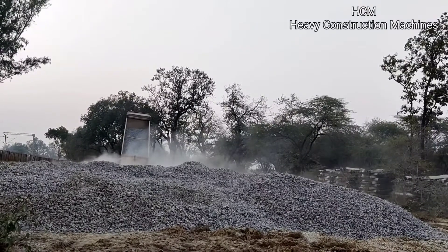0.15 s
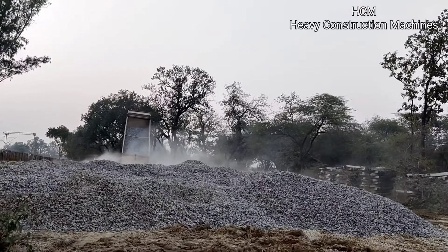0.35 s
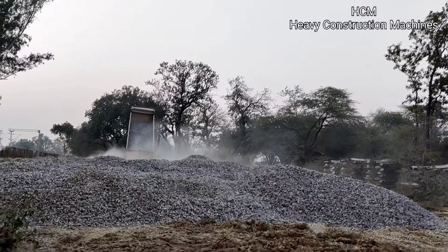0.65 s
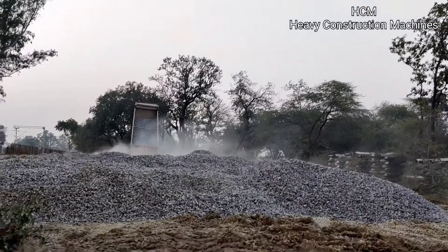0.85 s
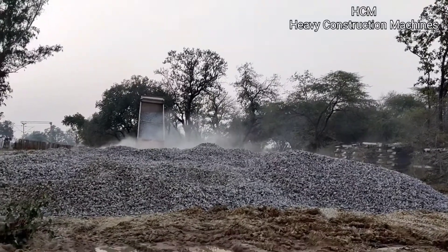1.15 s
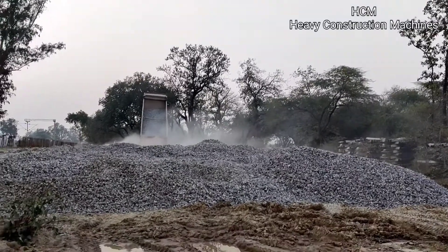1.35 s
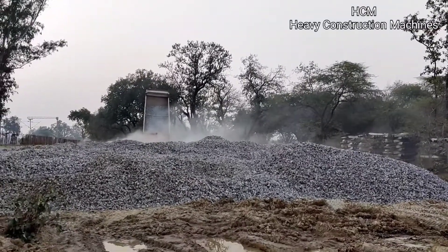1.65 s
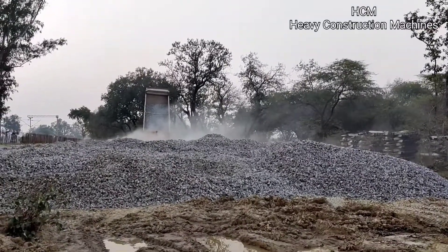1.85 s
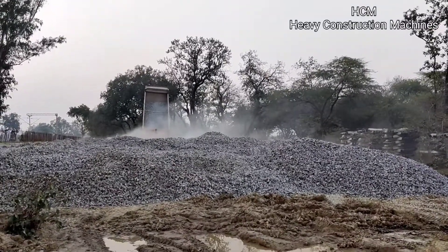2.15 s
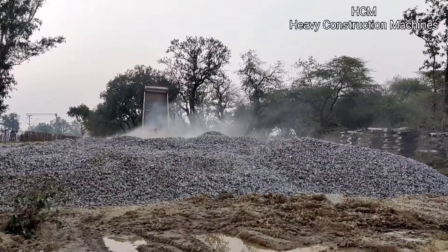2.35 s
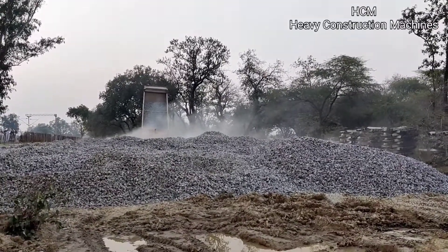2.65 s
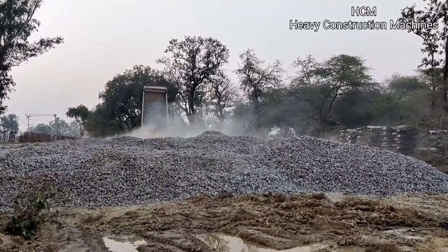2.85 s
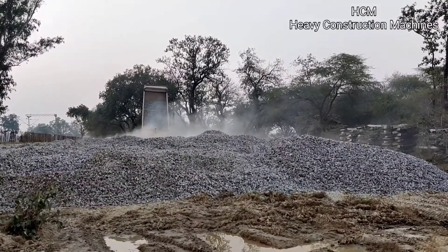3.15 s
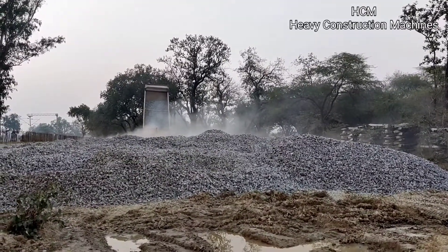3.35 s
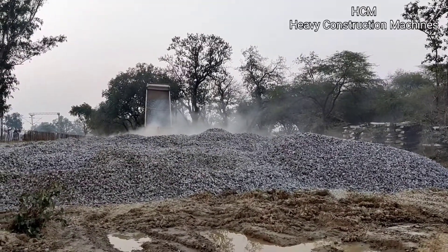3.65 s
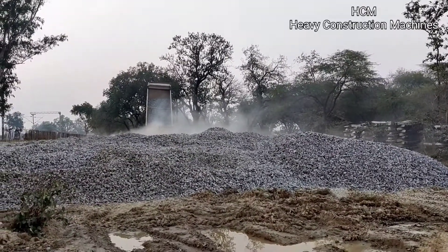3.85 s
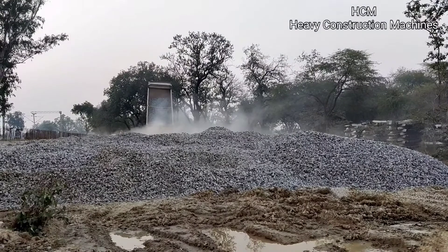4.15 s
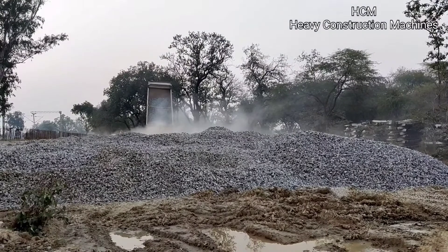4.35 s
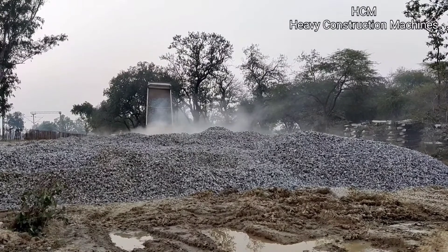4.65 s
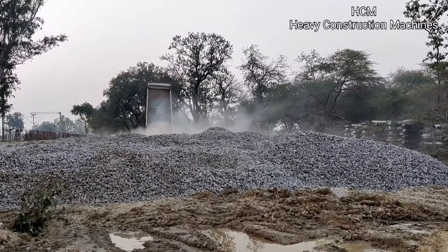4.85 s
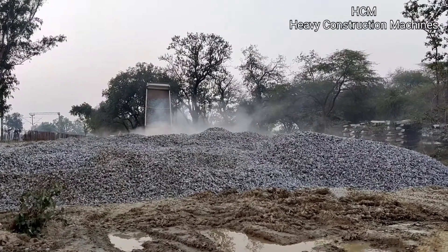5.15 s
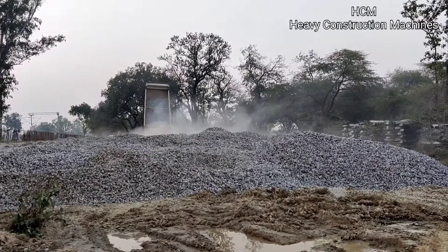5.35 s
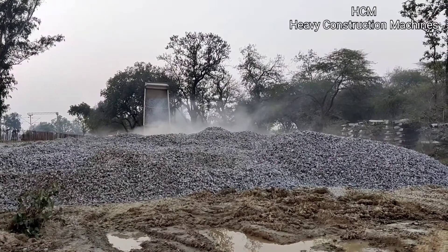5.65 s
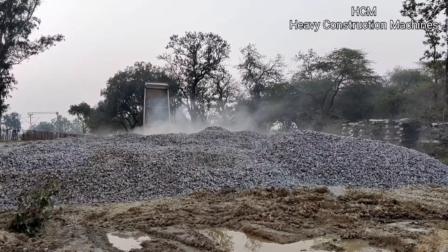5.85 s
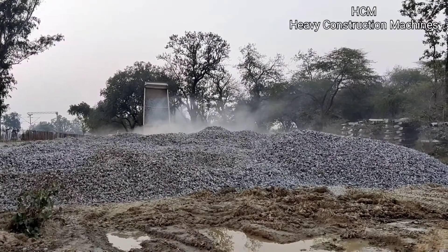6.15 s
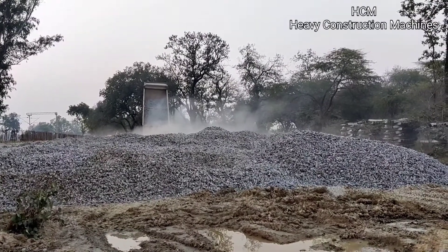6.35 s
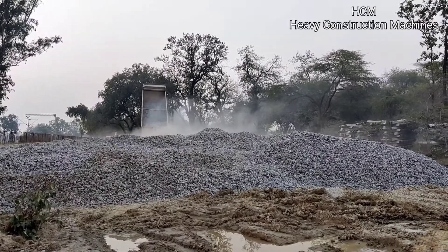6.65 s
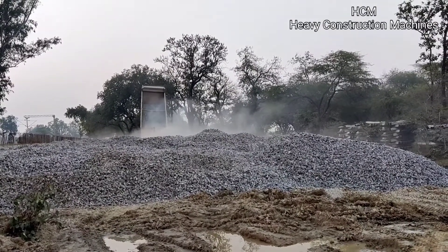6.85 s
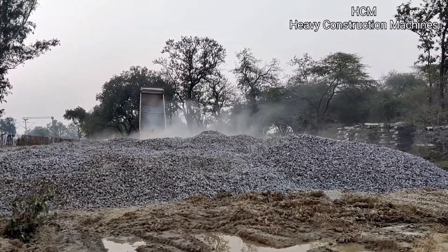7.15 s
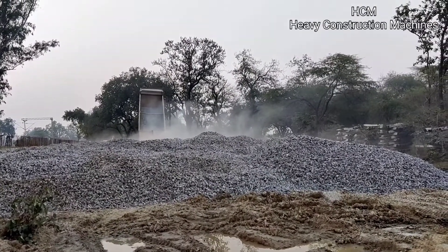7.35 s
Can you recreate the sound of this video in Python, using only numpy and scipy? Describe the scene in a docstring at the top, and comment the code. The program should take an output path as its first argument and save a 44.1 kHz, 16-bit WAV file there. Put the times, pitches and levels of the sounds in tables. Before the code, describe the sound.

Two low engines hum and throb continuously over a deep uneven rumble and faint whine. Gravel first comes in bright, quick bursts with hollow metal thuds, sharp stone clacks and tiny squeaks. It fades to a thin hiss, leaving motor and clatter forward, then a coarse roar of stone slowly swells. Open-air stockpile, distant phone microphone, slightly wide stereo.

```python
"""A tipper truck empties crushed stone behind a quarry stockpile, heard from far off in the open on a phone.
Throughout, firing tones and noise make its diesel drone and clatter; a second engine changes speed and beats.
At first stone slides from the raised body in short rushes, made of random clicks, and lumps thud on the steel.
Then the stone only trickles, until a long pour builds up, with a few more rushes and thuds near the end."""
import sys
import numpy as np
from scipy import signal
from scipy.fft import rfft, irfft
from scipy.io import wavfile
from scipy.ndimage import uniform_filter1d, minimum_filter1d

SR = 44100
rng = np.random.default_rng(int(sys.argv[2]) if len(sys.argv) > 2 else 0)


def transcribe(signal):
    """Save signal, clipped to [-1, 1], as a 16-bit WAV file at the path in sys.argv[1]."""
    frames = np.atleast_2d(signal).T
    limited = np.clip(frames, -1, 1)
    pcm = np.round(limited * 32767).astype(np.int16)
    wavfile.write(sys.argv[1], SR, pcm)


N = 331632  # length in samples, about 7.5 s


def undb(db):
    """Turn decibels into gain."""
    return 10 ** (np.asarray(db) / 20)


def curves(table):
    """Draw straight lines through a timed table: one curve per column, one value per sample."""
    s, *columns = np.transpose(table)
    return [np.interp(np.arange(N) / SR, s, column) for column in columns]


def over_bins(table):
    """Spread each column of a frequency table over the Fourier bins, along a log frequency scale."""
    hz, *columns = np.transpose(table)
    bins = np.log(np.arange(N // 2 + 1) * SR / N + 1)
    return [np.interp(bins, np.log(hz), column) for column in columns]


def unit(x):
    """Scale to an rms of 1."""
    return x / np.sqrt(np.mean(x ** 2))


def walk(rate):
    """Wander smoothly at random, spread near 1, with a new random step 'rate' times a second."""
    k = max(int(SR / rate), 1)
    steps = np.repeat(rng.standard_normal(N // k + 2), k)
    smooth = uniform_filter1d(uniform_filter1d(steps, k), k)
    return 1.62 * smooth[:N]


def swell(centre_s, half_s):
    """A bell-shaped rise and fall."""
    return np.exp(-((np.arange(N) / SR - centre_s) / half_s) ** 2)


def turning(hz, jitter):
    """Phase of a machine that turns slightly unevenly."""
    return 2 * np.pi * np.cumsum(hz * (1 + jitter * walk(30))) / SR


def tone(phase, shake_db):
    """One sine partial of rms near 1 whose level shakes."""
    start_phase = rng.uniform(0, 2 * np.pi)
    return np.sqrt(2) * undb(shake_db * walk(16)) * np.sin(phase + start_phase)


def impacts(per_s, spread_db):
    """A hail of tiny collisions of random size; a large positive spread makes a few stand out."""
    size = undb(spread_db * np.minimum(rng.exponential(size=N), 6))
    happens = rng.random(N) < per_s / SR
    return happens * size * rng.standard_normal(N)


def placed(x, pan_db):
    """Place a sound: the left port hears it a little later, and the pan makes one port louder."""
    late = np.roll(x, 16)  # samples
    return np.array([late[:N] * undb(pan_db / 2), x[:N] * undb(-pan_db / 2)])


def ports(direct, scattered, path, low_hz, high_hz, order=8):
    """Colour a sound for both ports: they share the direct part, shifted in phase; the scattered part is left only."""
    left_db, right_db, likeness, lead = over_bins(path)
    likeness = np.clip(likeness, 0, 1)
    hz = np.arange(N // 2 + 1) * SR / N + 1
    low_cut = 1 + (low_hz / hz) ** order
    high_cut = 1 + (hz / high_hz) ** (2 * order)
    edges = np.sqrt(SR / 2 / low_cut / high_cut)
    a, b = rfft(unit(direct)), rfft(unit(scattered))
    left = likeness * np.exp(1j * lead) * a + np.sqrt(1 - likeness ** 2) * b
    return irfft(edges * np.array([left * undb(left_db), a * undb(right_db)]), N)


def bursts(table, rise_s, t60_s, pan_db, width=None, order=4):
    """Each event is a dying burst of band noise, like close resonances; its row gives the width unless all share one."""
    out, t = np.zeros(N + SR), np.arange(SR // 2) / SR
    decay = np.exp(-np.log(1000) * t / t60_s)  # falls 60 dB in t60_s
    shape = (1 - np.exp(-t / rise_s)) * decay
    for s, db, hz, *own_width in table:
        ratio = 1 + (width or own_width[0])
        edges = np.clip([hz / ratio, hz * ratio], 20, SR / 2 - 1)
        band = signal.butter(order, edges, "band", fs=SR, output="sos")
        ring = shape * signal.sosfilt(band, rng.standard_normal(len(t)))
        start = int(max(s, 0) * SR)
        out[start:start + len(t)] += undb(db) * ring / np.abs(ring).max()
    return placed(out, pan_db)


def exhaust(phase, effort, note, shake_db, rough):
    """The low harmonics of an engine; load sets their balance, and firings grow uneven as it labours."""
    load, level_db = curves(effort)
    firing = phase / (2 * np.pi)
    count = np.arange(int(firing[-1]) + 2)
    # every firing draws its own strength and lateness
    draws = rng.standard_normal((len(count), 2)).T
    strength, lateness = (rough * load * np.interp(firing, count, draw) for draw in draws)
    harmonics = 0
    for k, (_, *dbs) in enumerate(note, 1):
        gain = undb(level_db + np.interp(load, [0, .5, 1], dbs))
        harmonics = harmonics + gain * tone(k * (phase + lateness / 2), shake_db)
    return (1 + strength) * harmonics


def second_engine():
    """Another engine drones at its own changing firing rate and slows toward the end."""
    # firing rate: t/s, f/Hz
    other_rate = [(0, 44.4), (.37, 41.2), (.7, 44), (1.12, 41.9), (1.42, 42.1), (1.77, 39.3), (2.14, 45.9),
                  (2.75, 43.3), (3, 43.3), (3.3, 42.1), (4.15, 40.5), (5.2, 40.3), (5.85, 38), (6.75, 33),
                  (7.52, 32.3)]
    # how hard it works: t/s, load (0-1), level change/dB
    other_effort = [(0, 0.024, 0.5), (0.901, .03, -1), (1.35, 0.28, -1), (1.9, 0.34, 0.5), (2.45, 0.68, -3),
                    (3.2, 0.87, -0.5), (3.55, 1, 1.5), (4.2, 0.81, 2), (5.6, 0.99, 2), (6.2, 0.9, 1),
                    (6.65, 1, -7), (7.52, .98, -4)]
    # balance of its note: harmonic, level/dB at light load, at half load, at full load
    other_note = [(1, -10, -15.5, -28), (2, -38, -17.5, -20), (3, -26, -40, -22.5)]
    phase = turning(curves(other_rate)[0], jitter=.0072)
    return exhaust(phase, other_effort, other_note, shake_db=.5, rough=.25)


def tipper_engine(firing):
    """The truck's diesel: more load moves its note from the fundamental to the overtones."""
    # how hard it works: t/s, load (0-1), level change/dB
    tipper_effort = [(0, 0, -1.5), (.75, 0.13, -0.5), (1.25, 0.23, -1.5), (1.7, 0.19, 0), (2.3, 0, 1),
                     (2.72, 0.09, 1), (3.02, 0.38, 1.5), (3.4, 0.53, 1.2), (3.9, 0.46, -0.5),
                     (4.45, 0.49, 1), (5.3, 1, 0.5), (6.1, 0.92, -0.5), (6.47, 0.52, -2), (6.68, 0.33, 0.7),
                     (7.2, 0.34, -0.5), (7.38, 0.72, -3), (7.52, 0.32, 1.5)]
    # balance of its note: harmonic, level/dB at light load, at half load, at full load
    tipper_note = [(1, -9.5, -16.5, -27), (2, -27.5, -15, -13.5), (3, -33.5, -38, -23.5)]
    return exhaust(firing, tipper_effort, tipper_note, shake_db=0.35, rough=.09)


def whine(firing_hz, machinery_db, shake_db, octave_shake_db, jitter):
    """A gear or pump driven by the tipper's engine; its steadier octave rings out now and then."""
    # moments when the octave rings out: centre t/s, half length/s, level/dB before the machinery level
    whine_swells = [(3.97, 0.21, -28), (6.53, .13, -32)]
    phase = turning(5.5 * firing_hz, jitter)  # 5.5 cycles per firing
    octave = undb(-42.5) + sum(undb(db) * swell(s, half_s) for s, half_s, db in whine_swells)
    main_tone = undb(-34) * tone(phase, shake_db)
    return undb(machinery_db) * (main_tone + octave * tone(2 * phase, octave_shake_db))


def hums(shake_db, jitter):
    """Deep tones that glide while they swell and fade."""
    # one hum a row: centre t/s, half length/s, f/Hz, glide/(Hz per s), level/dB at the centre
    hum_table = [(5.58, 0.35, 56.8, 25.5, -16.5), (5.997, 0.45, 213.6, -2, -23.5)]
    t = np.arange(N) / SR
    out = 0
    for s, half_s, hz, glide, db in hum_table:
        phase = turning(hz + glide * (t - s), jitter)
        out = out + undb(db) * swell(s, half_s) * tone(phase, shake_db)
    return out


def rumble():
    """Deep, uneven shudder of the truck under its moving load: random knocks, filtered low."""
    # colour of the rumble: f/Hz, relative level/dB
    rumble_colour = [(15, -17), (27, -4), (38, -7.5), (56, 3.5), (78, 3), (105, -2), (150, -4), (195, -4),
                     (250, -23.5), (400, -56)]
    colour_db, = over_bins(rumble_colour)
    return unit(irfft(rfft(impacts(900, 1.7)) * undb(colour_db), N))


def clatter(phase, depth, flutter_db):
    """Combustion knock and fan air: noise pulsing with each firing."""
    # way to the ports: f/Hz, left and right relative level/dB per Hz, likeness (0-1), left phase lead/rad
    clatter_path = [(850.0, -57.5, -53.5, 0.67, -2.5), (1090, -56.5, -50.5, 0.86, -3),
                    (1500.0, -60.5, -52, 0.82, -3), (2070, -66, -57, 0.31, -3),
                    (2580, -64.5, -59.5, 0.72, -2), (2840, -76.5, -65.5, 0.13, -9.5),
                    (3220, -64, -63, 0.51, -0.5), (3830, -78, -68, 0.19, -2.5),
                    (4200, -66.5, -64.5, 0.93, -1.4), (5410, -74.5, -61.5, 0.19, -3),
                    (6240, -71.5, -78, 1, 7.5), (7400, -80, -80.5, 0.02, -3.5),
                    (10400, -86, -86.5, 0.2, -23), (15000.0, -97, -95, 0.41, -33)]
    gate = (1 + depth * np.cos(phase)) * undb(flutter_db * walk(22.185))
    direct, scattered = gate * rng.standard_normal((2, N))
    return ports(direct, scattered, clatter_path, low_hz=846, high_hz=14600)


def drumming(flutter_db):
    """Stones tumbling along the steel floor make it boom."""
    # way to the ports: f/Hz, left and right relative level/dB per Hz, likeness (0-1), left phase lead/rad
    drum_path = [(229, -49, -43, 0.94, 0.3), (295, -44.5, -47.5, 0.96, -0.84),
                 (376, -49.5, -46.5, 0.98, -0.64), (436, -48.5, -49, 0.97, -1.33),
                 (553, -50.5, -48, 0.8, -1.44), (672, -51.5, -48.5, 0.94, -1.2),
                 (795, -50.5, -50.5, 0.6, -2)]
    sound = ports(impacts(4000, 1.8), impacts(4000, 3.8), drum_path, low_hz=203, high_hz=779, order=6)
    return sound / sound.mean(0).std() * undb(flutter_db * walk(18))


def squeaks():
    """Thin high squeaks: very narrow, short bursts of noise."""
    # one squeak a row: t/s, peak level/dB before panning, f/Hz
    squeak_table = [(.6, -36.5, 13400), (.635, -39.5, 13050), (1.465, -36, 13030)]
    return bursts(squeak_table, width=0.012, rise_s=.02, t60_s=0.099, pan_db=.3)


def clacks():
    """Single stones clack: sharp bursts that die at once."""
    # one clack a row: t/s, peak level/dB before panning, f/Hz, width as a share of f
    clack_table = [(1.354, -13, 4700, .15), (1.358, -21, 8500, .25), (2.6075, -15, 4750, .11),
                   (2.6235, -16, 5200, .11), (2.6235, -21, 1950, .15), (2.638, -23, 4900, .13),
                   (6.129, -18, 4650, .04), (7.155, -17, 2820, .07), (7.334, -20, 8300, .28),
                   (7.347, -19, 8000, .3)]
    return bursts(clack_table, rise_s=.0008, t60_s=0.02, pan_db=-7)


def thuds():
    """Lumps thud on the steel: wide, mostly low bursts."""
    # one thud a row: t/s, peak level/dB before panning and the steel body, f/Hz
    thud_table = [(.06, -12.5, 400), (.115, -10.5, 240), (.563, -16, 333), (.958, -11, 300),
                  (1.11, -9.5, 182), (1.12, -14, 1250), (1.148, -12.5, 430), (1.24, -13, 200),
                  (1.635, -14, 295), (1.79, -13.5, 200), (2.195, -12, 250), (2.63, -11.5, 344),
                  (2.68, -12.5, 312), (2.82, -16, 345), (3.02, -12, 162), (3.89, -12, 258),
                  (7.347, -11.5, 476), (7.44, -16, 430)]
    return bursts(thud_table, width=.5, rise_s=.006, t60_s=.22, pan_db=-.5)


def patchy(x, depth_db, rate):
    """Each treble band flickers on its own, the highest most."""
    centres = np.geomspace(1000, 14000, num=10)  # Hz
    spectrum, out = rfft(x), 0
    for hz, share in zip(centres, np.eye(len(centres))):
        band, = over_bins(np.transpose([centres, share]))
        flicker = unit(undb(depth_db * hz / centres[-1] * walk(rate)))
        out = out + irfft(spectrum * band, N) * flicker
    return out


def steel_body(x):
    """The panels favour some frequencies and swallow others."""
    # resonances and notches of the steel: f/Hz, width/Hz, level change/dB
    body = [(264, 20, -1), (535, 27, 2.5), (738, 14, 4.5), (875, 39, -2), (903, 34, 3), (1550, 120, -0.1),
            (2230, 130, -1), (2430, 80, 1.5), (4150, 250, 1), (5340, 320, 1.5)]
    bins = np.arange(N // 2 + 1) * SR / N
    colour_db = sum(db / (1 + (2 * (bins - hz) / width) ** 2) for hz, width, db in body)
    return irfft(rfft(x) * undb(colour_db), N)


def stone_flow():
    """Each slide gathers speed, runs and dies away; powers add. Gives the dB of hiss, roar and rattle."""
    # one slide a row: start t/s, rise/s, hold/s, decay/s,
    # then relative level/dB of bright hiss, of duller roar, of the rattle of coarse stones
    slides = [(-.35, 0.51, 1.41, 1.43, -6.5, -17, -10), (.15, 0.054, 0.041, 0.14, -26, -14, -3.5),
              (0.449, 0.036, 0.022, 0.022, -8, -9, -2), (0.897, 0.1, 0.44, .3, -3, -12, -9),
              (1.05, 0.07, 0.27, 0.25, -18, -9.5, -20), (1.319, 0.021, 0.029, 0.032, -2, -13, -16),
              (1.445, 0.094, 0.37, 0.1, -8.5, -20, -5.5), (4.603, 2.35, .7, 1, -19, -0.77, -2.5),
              (6.372, 0.066, 0.059, 0.43, -17, -7, -7), (6.9, 0.051, .05, 0.068, -6, -8.5, -0.5),
              (7.306, 0.027, 0.14, .1, -6.5, -10, -17)]
    t = np.arange(N) / SR
    # between slides a hissing trickle of stones keeps running; roar and rattle are nearly silent
    power = undb([[-17.5], [-40], [-40]]) ** 2
    for start, rise, hold, decay, *dbs in slides:
        age = t - start
        dying = np.exp(-np.maximum(age - rise - hold, 0) / decay)
        flow = np.clip(age / rise, 0, 1) ** 2 * dying
        power = power + (flow * undb(dbs)[:, None]) ** 2
    return 10 * np.log10(power)


def coarse_stones(flow_db, per_s, spread_db, clump_db, clump_rate, pan_db):
    """Larger stones tumble in clumps and ring briefly; each resonance is struck by its own stones."""
    # what the stones ring with: f/Hz, width/Hz, level/dB before the flow
    stone_rings = [(2690, 820, -25), (4050, 340, -34), (4800, 570, -32.5)]
    hz, out = np.arange(N // 2 + 1) * SR / N + 1, 0
    clumps = clump_db * walk(clump_rate)  # shared by all resonances
    for centre, width, db in stone_rings:
        ring = 1 / (1 + 1j * (hz - centre ** 2 / hz) / width) ** 2
        surge = unit(undb(clumps + clump_db * walk(clump_rate)))
        # each port gets its own strikes
        pair = [unit(irfft(rfft(surge * impacts(per_s, spread_db)) * ring, N)) for _ in range(2)]
        out = out + undb(db) * np.array(pair)
    return out * undb(flow_db) * undb([[pan_db / 2], [-pan_db / 2]])


def stone_rush(flow_db, path, low_hz, per_s, spread_db, surge_db):
    """Stone on stone: the collisions come thicker as the flow grows, in small surges."""
    density = undb(flow_db / 2)
    direct, scattered = (impacts(per_s * density, spread_db) / np.sqrt(density) for _ in range(2))
    sound = ports(direct, scattered, path, low_hz, high_hz=15000)
    return sound * undb(flow_db + surge_db * walk(18))


def stone_roar(roar_db):
    """The duller part of the sliding stone."""
    # way to the ports: f/Hz, left and right relative level/dB per Hz, likeness (0-1), left phase lead/rad
    roar_path = [(456, -50, -55.5, 1, 0.4), (854, -53, -54.5, 0.75, -1.3), (1230, -51.5, -58, 0.75, -4),
                 (1480, -56.5, -65.5, 0.39, -6), (1940, -52.5, -50, 0.31, -4.5),
                 (2510, -56.5, -54.5, 0.64, 0), (3080, -56, -59.5, 0.17, 1.5), (3500, -61, -64, 0.16, 2),
                 (4060, -56.5, -57, 0.47, 1.5), (5100.0, -66.5, -59.5, 0.29, 1),
                 (5830, -60.5, -61, 0.12, -6), (7570, -75, -80, 0.29, 3), (9460, -75.5, -74, 0.71, -10.5),
                 (14500.0, -94, -95, 0.05, -18)]
    return stone_rush(roar_db, roar_path, low_hz=483, per_s=12000, spread_db=1.8, surge_db=.6)


def stone_hiss(hiss_db):
    """The bright part of the sliding stone, with the trickle."""
    # way to the ports: f/Hz, left and right relative level/dB per Hz, likeness (0-1), left phase lead/rad
    hiss_path = [(800.0, -51.5, -54, 0.5, -2), (1240, -54.5, -55.5, 0.8, -2.5),
                 (1720, -64.5, -57, 0.42, -3.5), (2230, -63.5, -55, 0.34, 0.5), (2880, -61, -57, 0.24, -1),
                 (3300, -58, -52.5, 0.57, 3.5), (3480, -56, -54.5, 0.61, 2), (4200, -65, -56, 0.16, 6),
                 (4970, -59.5, -55.5, 0.22, 6), (5600, -68, -60.5, 0.22, 13), (5900, -59.5, -60.5, 0.41, 1),
                 (7340, -74, -78, 0.95, 2), (9900, -77, -78, 0.08, -16.5), (14400, -95, -94, 0.21, 6)]
    return stone_rush(hiss_db, hiss_path, low_hz=905, per_s=12000, spread_db=1.45, surge_db=0.8)


def scene():
    """Engines and body below, rushing stone above."""
    # firing rate of the tipper: t/s, f/Hz
    tipper_rate = [(0, 67.6), (.57, 67.7), (.87, 65.9), (1.7, 65.9), (2.7, 66.1), (3.02, 67.2), (3.4, 66.5),
                   (3.65, 65.3), (4.2, 65.4), (4.45, 69.6), (4.77, 66.6), (5.02, 67.2), (5.55, 67),
                   (6.5, 65.5), (7.2, 65.4), (7.52, 65.9)]
    # the truck's other noises: t/s, rumble level/dB, drumming level/dB, clatter and whine level change/dB
    truck = [(0, -18.5, -23.5, -7.5), (.6, -22, -26.5, -11), (2.1, -18, -24, -4.5),
             (3.6, -16.5, -23.5, 0.36), (5, -17, -24.5, 0.2), (6.3, -16, -23.5, 1.5),
             (7.52, -17.5, -26, -2)]
    tipper_hz, = curves(tipper_rate)
    rumble_db, drum_db, machinery_db = curves(truck)
    firing = turning(tipper_hz, jitter=0.003)

    engines = second_engine() + tipper_engine(firing)
    gears = whine(tipper_hz, machinery_db, shake_db=2.4, octave_shake_db=.6, jitter=0.0017)
    bass = engines + gears + hums(shake_db=2.5, jitter=0.0069) + undb(rumble_db) * rumble()

    knock = undb(machinery_db) * clatter(firing, depth=0.1, flutter_db=0.4)
    boom = undb(drum_db) * drumming(flutter_db=0.74)

    hiss_db, roar_db, coarse_db = stone_flow()
    coarse = coarse_stones(coarse_db, per_s=1200, spread_db=-0.8, clump_db=1.5, clump_rate=75, pan_db=-4.5)
    rattle = patchy(stone_hiss(hiss_db) + stone_roar(roar_db) + knock, depth_db=3, rate=34)
    on_truck = steel_body(rattle + coarse + boom + thuds())
    return placed(bass, pan_db=1.5) + on_truck + clacks() + squeaks()


def record(dry):
    """The phone's limiter eases the gain down around the highest peaks; the top is cut."""
    span = 265  # samples
    allowed = .97 / np.maximum(np.abs(dry).max(0), .97)
    gain = uniform_filter1d(minimum_filter1d(allowed, span), span)
    top_cut = signal.ellip(8, .2, 70, 15600, fs=SR, output="sos")  # low-pass at 15600 Hz
    return signal.sosfilt(top_cut, gain * dry)


dry = scene()
out = record(dry)
transcribe(out)
```